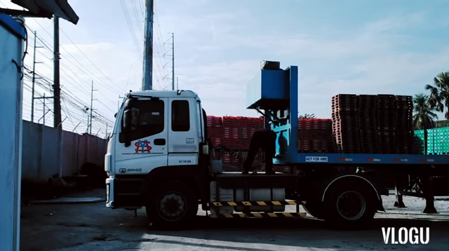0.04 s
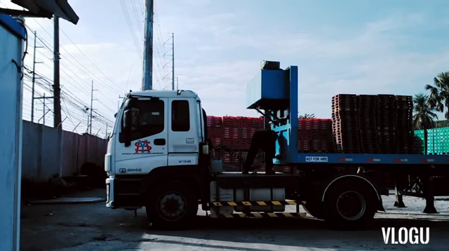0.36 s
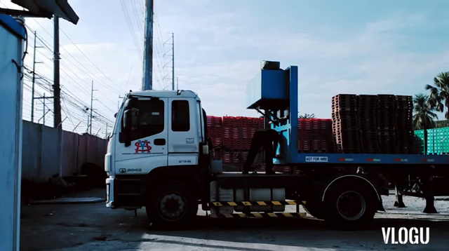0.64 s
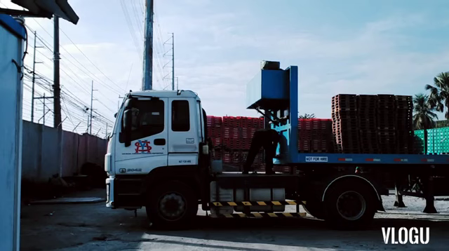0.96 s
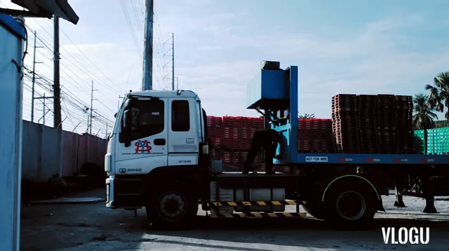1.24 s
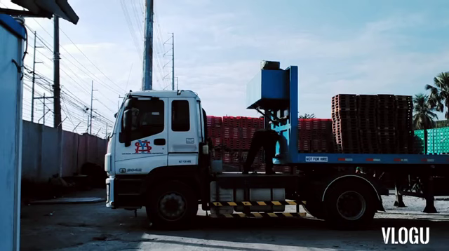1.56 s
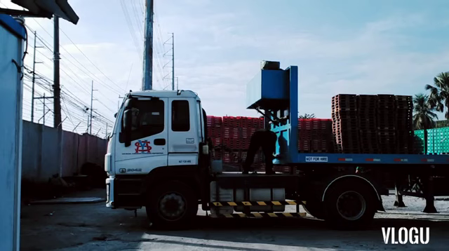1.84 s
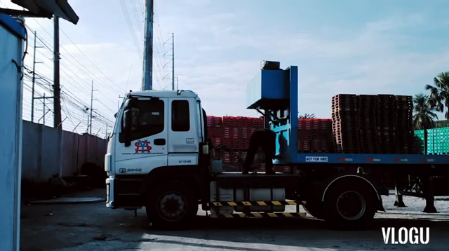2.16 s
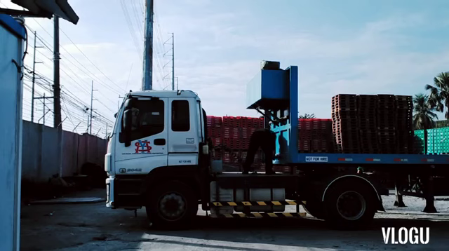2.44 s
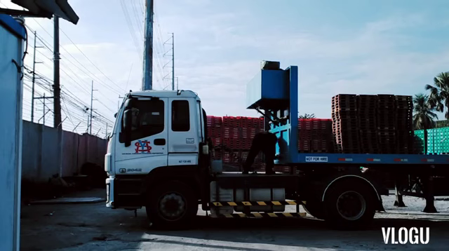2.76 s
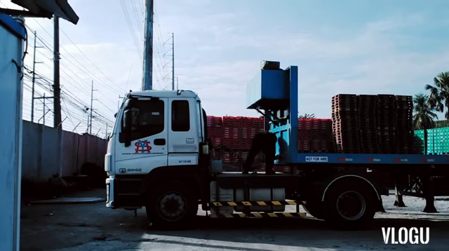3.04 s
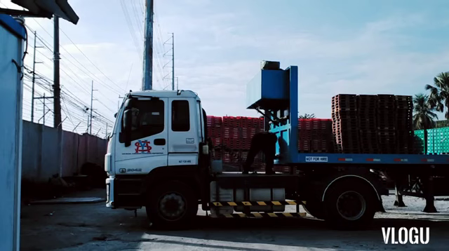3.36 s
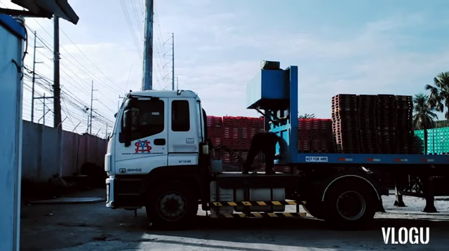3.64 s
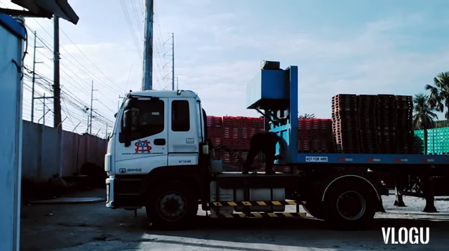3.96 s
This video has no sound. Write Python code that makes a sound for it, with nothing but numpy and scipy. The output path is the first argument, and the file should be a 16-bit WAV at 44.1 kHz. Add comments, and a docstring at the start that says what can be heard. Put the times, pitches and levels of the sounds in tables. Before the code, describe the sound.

Two short, sharp hisses of released air come about a second apart in a walled outdoor yard, followed by a faint sizzling leak. Beneath them a diesel truck idles with a low rumble and light clatter.

```python
"""Compressed air blasts twice from a valve beside a truck in a walled yard.
The rushing air makes its outlet ring. As the valve shuts, a thin fizz outlasts each blast,
and after the second one a faint leak keeps seeping. The yard walls echo the blasts.
A diesel engine idles underneath, and there are two soft scuffs."""
import sys
import numpy as np
from scipy import signal
from scipy.fft import rfft, irfft, next_fast_len
from scipy.io import wavfile
from scipy.ndimage import map_coordinates

SR = 44100
rng = np.random.default_rng(int(sys.argv[2]) if len(sys.argv) > 2 else 0)


def file_out(sig):
    """Save sig as 16-bit WAV at sys.argv[1]."""
    # one column per channel
    cols = np.atleast_2d(sig).T
    # limit, then scale
    lim = np.clip(cols, -1, 1)
    pcm = np.round(lim * 32767).astype(np.int16)
    wavfile.write(sys.argv[1], SR, pcm)


N = 176400  # 4 seconds

# One row per blast: opens t/s, shuts t/s, body level/dB, body drift/(dB/s), jet level/dB,
# whistles against the jet/dB, fizz level/dB, closing hiss level/dB, fade/(dB/s)
BLASTS = [(-.1, 0.474, -33.5, -4, -39.5, -2.5, -41, -42.5, 226),
          (1.438, 1.815, -33, 7.5, -37, 0.5, -41, -43, 400)]
# Boost or cut between the body and the brighter jet, one per blast: level/dB
VALLEY_DB = [1.5, -2.5]
# Pitches at which the outlet rings and the jet whistles: f/Hz, width/Hz, relative level/dB
OUTLET_RINGS = [(2285, 35, -4), (2445, 55, -3), (2620, 80, -4), (2785, 40, -1), (2878, 42, 0),
                (3036, 48, 1), (3140, 60, -4), (3290, 50, -6), (3392, 60, -3), (3628, 40, -11),
                (3940, 70, -18)]
JET_WHISTLES = [(4950, 80, -9), (5450, 160, -9), (6100, 190, -4), (7027, 40, -2), (7333, 28, 3),
                (7503, 28, 3), (7680, 60, 3), (7850, 90, -2)]
# Tone colours of the blast's four noises: f/Hz, relative level/dB
BODY_COLOUR = [(300, -34), (700, -15), (1300, -13.5), (1850, -13), (2300, -2.5), (2900, 0), (3400, -4.5),
               (3750, -13.5), (4400, -15), (6000, -26)]
JET_COLOUR = [(3500, -65), (4500, -9), (5200, -0.5), (6200, -2), (6700, -1.5), (7600, 2.5), (8000, 4.5),
              (8400, -16), (10000, -25), (13000, -43)]
FIZZ_COLOUR = [(3000, -32), (4600, -26), (6000, -19), (8500, 0.5), (9500, -5), (10800, -8.5), (12800, -9),
               (14200, -1), (15500, 4.5)]
CLOSING_COLOUR = [(1500, -6), (2400, -3), (3100, -23), (4000, -13), (6000, -8), (7300, -5), (8400, 2),
                  (9100, -3.5), (10200, -11), (15000, -16)]

def air_blasts():
    """Unsteady air rings the outlet; the closing valve makes it flare, then pinches it to a hiss."""
    out, t = np.zeros(N), clock()
    flare_s, fizz_hold_s, fizz_fade_db_per_s = 0.0081, 0.084, 223.5
    for blast, valley_db in zip(BLASTS, VALLEY_DB):
        opens, shuts, body_db, drift, jet_db, whistle_db, fizz_db, closing_db, fade = blast
        unsteady_db = 0.3 * wobble(34.4) + 0.5 * wobble(260)  # slow flutter, fast sputter
        flare_db = 1.5 * bump(t, shuts - flare_s / 2, flare_s)
        flow = gate(opens, shuts, 0.021, fade) * gain(flare_db)
        body = unit(noise(BODY_COLOUR) + gain(-1.5) * ringing(OUTLET_RINGS))
        body *= gain(body_db + drift * (t - shuts) + unsteady_db)
        jet = unit(noise(JET_COLOUR) + gain(whistle_db) * ringing(JET_WHISTLES))
        jet *= gain(jet_db + 0.89 * unsteady_db)
        out += flow * filtered(body + jet, lambda hz: gain(valley_db * bump(hz, 4200, 450)))
        sealed = shuts + fizz_hold_s
        fizz = gain(fizz_db + 0.34 * unsteady_db) * noise(FIZZ_COLOUR)
        out += gate(opens, sealed, 0.0027, fizz_fade_db_per_s) * fizz
        closing_hiss = gain(closing_db) * noise(CLOSING_COLOUR)
        out += gate(shuts, sealed, 0.017, fizz_fade_db_per_s) * closing_hiss
    return out


# Time the echo takes to fade by 60 dB: f/Hz, t/s
ECHO_FADE = [(200, 1), (2500, 0.71), (8000, 0.75), (15000, 0.68)]

def yard_echo(sound):
    """The walls echo the sound, treble dying first; stirred air keeps changing the echo."""
    out = np.zeros(N)
    renew_s, rise_s = 0.16, 0.0067
    last_shut = BLASTS[-1][1]
    for centre in np.arange(0, last_shut + 2 * renew_s, renew_s):
        hz, t, bands = signal.stft(rng.standard_normal(SR), SR, nperseg=256)
        fading = gain(-60 * t / at_pitch(ECHO_FADE, hz)[:, None])
        tail = signal.istft(bands * fading, SR, nperseg=256)[1]
        tail *= np.clip(np.arange(len(tail)) / SR / rise_s, 0, 1)
        share = np.sqrt(np.clip(1 - np.abs(clock() - centre) / renew_s, 0, 1))  # blends the echoes
        out += signal.fftconvolve(sound * share, tail / np.linalg.norm(tail))[:N]
    return out


# Tone colour of the leak: f/Hz, relative level/dB
LEAK_COLOUR = [(4000, -9.5), (7000, -29), (8300, 1), (10000, -10), (12500, -7), (14000, -7), (15400, 0)]
# Pitches at which the leak rings: f/Hz, width/Hz, relative level/dB
LEAK_RINGS = [(11100, 260, -14), (11820, 200, -13), (13700, 200, -9), (14420, 200, -7), (14910, 110, -2),
              (15400, 130, 2), (15680, 100, -9)]
# The leak's spurts: t/s, level/dB
LEAK_LEVEL = [(1.85, -90), (1.98, -49.5), (2.1, -59), (2.18, -58.5), (2.29, -64), (2.54, -63.5),
              (2.81, -63), (2.9, -68), (3.22, -63.5), (3.36, -60.5), (3.58, -60.5), (3.65, -63),
              (3.72, -59), (3.83, -60.5), (3.88, -68)]

def leak():
    """Air seeps out in faint, sizzling spurts after the second blast."""
    sizzle = unit(noise(LEAK_COLOUR) + gain(-2.5) * ringing(LEAK_RINGS))
    return gain(curve(LEAK_LEVEL) + 1.3 * wobble(23) + wobble(120)) * sizzle


# The engine's swells, and the clatter's own on top of them: t/s, relative level/dB
ENGINE_LEVEL = [(0, -39.5), (.44, -40), (.58, -35.5), (.72, -39.5), (1.1, -42), (1.35, -40.5), (1.78, -41),
                (1.87, -38), (2.18, -38), (2.32, -40.5), (2.6, -39), (2.8, -41), (3.95, -41.5)]
CLATTER_LEVEL = [(.8, 0), (1.35, -0.5), (2.05, 1.5), (2.4, 1.3), (2.75, 0.4), (3.3, 0), (3.9, -.6)]
# Notes in the engine's hum: f/Hz, level before the swells/dB
HUM_TONES = [(125, -56), (174.7, -48), (227, -50), (349.7, -58), (450, -60), (499.9, -56.5), (550.2, -57.5)]
# Tone colours of the engine's three noises: f/Hz, relative level/dB
RUMBLE_COLOUR = [(15, -87), (25, -69), (58, -22.5), (90, -8.5), (109, -4.5), (167, -0.5), (199, -6.5),
                 (228, -1.5), (257, -4.5), (452, -9), (626, -14), (756, -14), (1500, -26.5), (1950, -68),
                 (3300, -120)]
CLATTER_COLOUR = [(590, -11), (1000, -5.5), (1260, -7.5), (1500, -3.5), (2510, -8), (2780, -8.5),
                  (3310, -13), (4510, -23.5), (5740, -24.5), (8580, -19.5), (9630, -28), (11300, -33.5),
                  (13000, -29), (15600, -21)]
TICK_COLOUR = [(4000, -4), (7500, -6), (10000, -4), (13000, -10), (15500, 4)]
# Pitches at which panels buzz with the engine: f/Hz, width/Hz, relative level/dB
PANEL_RINGS = [(734, 18.4, 4.5), (912, 50, -2), (1253, 44, -4.5), (2090, 19, -9), (2450, 86, -12.5),
               (2617, 37, -9), (3350, 130, -18.5)]

def diesel_engine():
    """An idling diesel hums; rumble, clatter and panels throb with each firing, a tick with every other."""
    t, level_db = clock(), curve(ENGINE_LEVEL)
    firing_hz, tick_at_s = 25, 0.835
    firings = firing_hz * (t - tick_at_s) + 0.099 * wobble(4.01)  # a slightly uneven count
    beat = np.cos(2 * np.pi * firings)
    hum = np.zeros(N)
    for hz, db in HUM_TONES:
        hum += gain(db + 2.4 * wobble(9)) * np.sin(2 * np.pi * hz * t + 0.75 * wobble(7))
    rumble = gain(level_db - 0.5) * unit(noise(RUMBLE_COLOUR) * (1 + 0.081 * beat))
    rattle = gain(-54.5 - 0.04 * wobble(14)) * noise(CLATTER_COLOUR)
    panels = gain(-57 + 1.8 * wobble(8)) * ringing(PANEL_RINGS)
    clatter = gain(curve(CLATTER_LEVEL)) * (rattle + panels) * (1 + 0.1 * beat)
    tick_pulses = np.exp(1.8 * (np.cos(np.pi * firings) - 1))
    ticks = gain(-62.5 + 1.5 * wobble(10)) * tick_pulses * noise(TICK_COLOUR)
    swell = gain(0.53 * (level_db - level_db.mean()))  # partly follows the rumble
    return rumble + swell * (hum + clatter) + ticks


# One row per scuff: middle t/s, half-length/s, level/dB
SCUFFS = [(.975, .025, -58), (2.535, .04, -57.5)]
# Tone colour of the scuffs: f/Hz, relative level/dB
SCUFF_COLOUR = [(800, -12), (1500, 4), (3000, 5), (4500, -6), (5400, -14), (9000, -27)]

def scuffs():
    """Brief, soft rubbing sounds swell and fade."""
    loudness = sum(gain(db) * bump(clock(), middle, width) for middle, width, db in SCUFFS)
    return loudness * noise(SCUFF_COLOUR)


def gain(db):
    """Turn decibels into a number to multiply by."""
    return 10 ** (np.asarray(db) / 20)


def unit(x):
    """Scale a sound to an average strength (rms) of 1."""
    return x / np.sqrt(np.mean(x ** 2) + 1e-20)


def at_pitch(points, hz):
    """Read between (f/Hz, value) points on a musical (log) scale."""
    f, values = np.transpose(points)
    return np.interp(np.log(hz + 1), np.log(f + 1), values)


def clock():
    """The time of each sample, in seconds."""
    return np.arange(N) / SR


def curve(points):
    """Join (t/s, value) points with straight lines."""
    return np.interp(clock(), *np.transpose(points))


def bump(x, centre, width):
    """A smooth hill of height 1."""
    return np.exp(-((x - centre) / width) ** 2)


def wobble(per_second):
    """A smooth curve through this many random values a second."""
    values = rng.standard_normal(int(N * per_second / SR) + 4)
    return map_coordinates(values, [clock() * per_second])


def gate(start, stop, rise_s, fade_db_per_s):
    """Rise from start, hold until stop, then fade away."""
    t = clock()
    return np.clip((t - start) / rise_s, 0, 1) * gain(-fade_db_per_s * np.maximum(t - stop, 0))


def filtered(x, response):
    """Multiply each frequency in a sound by response(hz)."""
    size = next_fast_len(N + SR // 2)
    return irfft(rfft(x, size) * response(np.fft.rfftfreq(size, 1 / SR)), size)[:N]


def noise(colour):
    """Rushing noise with the given tone colour, at strength 1."""
    return unit(filtered(rng.standard_normal(N), lambda hz: gain(at_pitch(colour, hz))))


def ringing(rings):
    """Noise that rings at a few narrow pitches, at strength 1."""
    def response(f):
        power = sum(gain(db) ** 2 / (1 + ((f - hz) / width) ** 2) ** 2 for hz, width, db in rings)
        return np.sqrt(power)
    return unit(filtered(rng.standard_normal(N), response))


def scene():
    """The blasts and their echo over the leak, the engine and the scuffs."""
    air = air_blasts()
    return (air + leak() + diesel_engine() + scuffs() + gain(-10.5) * yard_echo(air))[None]


def record(dry):
    """Soften the deepest bass and cut off the very highest treble."""
    low_hz, top_hz = 40, 15760
    return filtered(dry[0], lambda hz: (hz < top_hz) * hz ** 2 / np.hypot(hz ** 2, low_hz ** 2))[None]


dry = scene()
out = record(dry)
file_out(out)
```